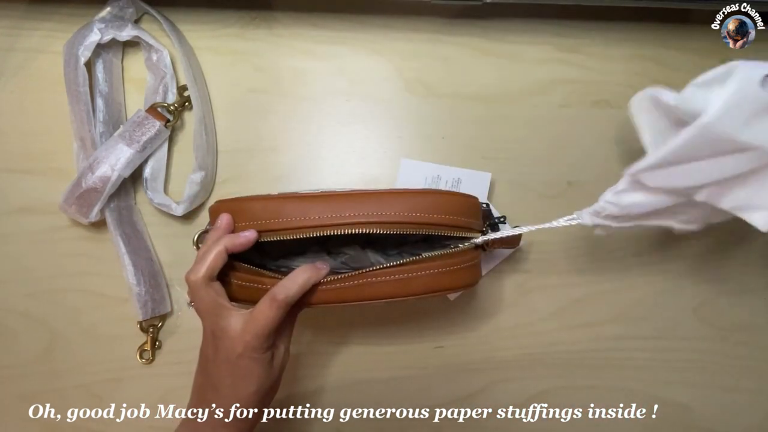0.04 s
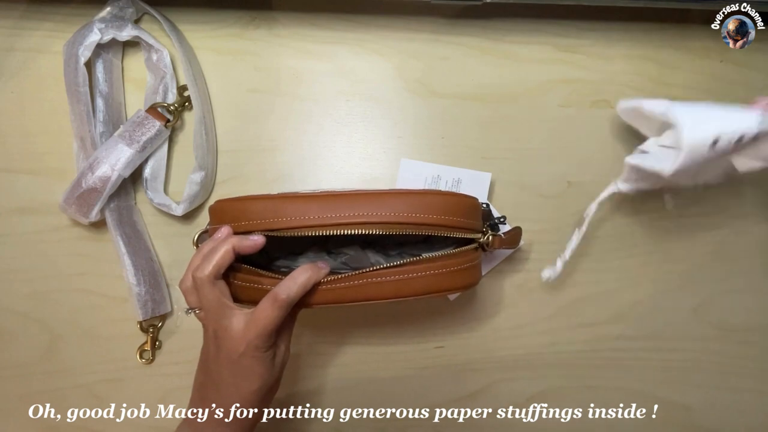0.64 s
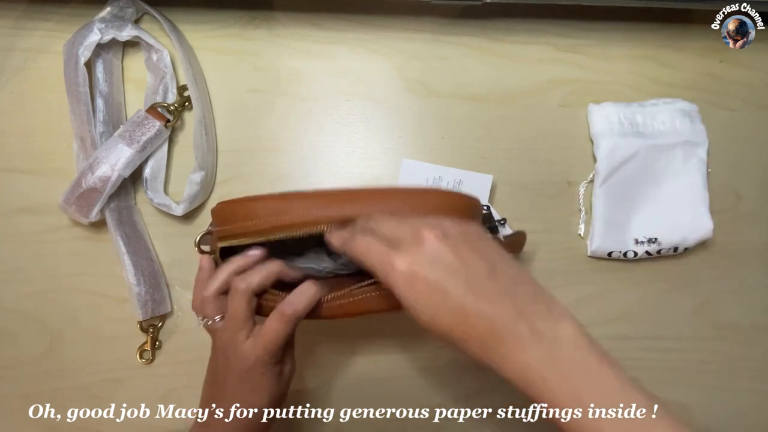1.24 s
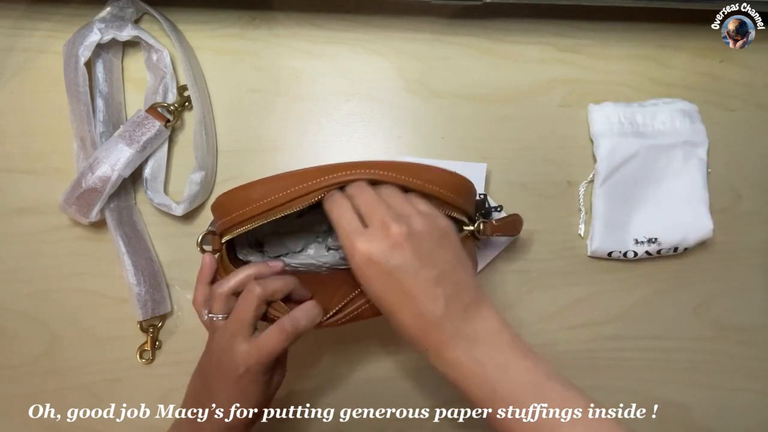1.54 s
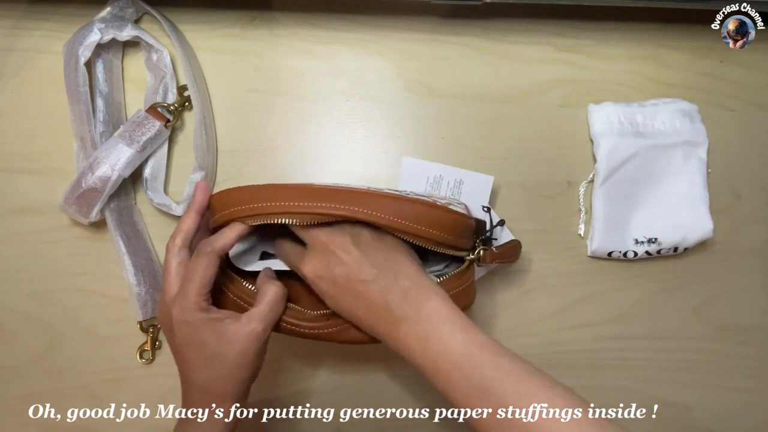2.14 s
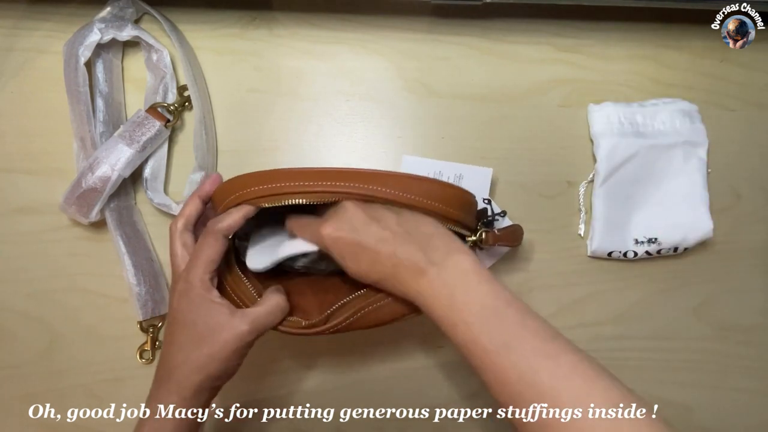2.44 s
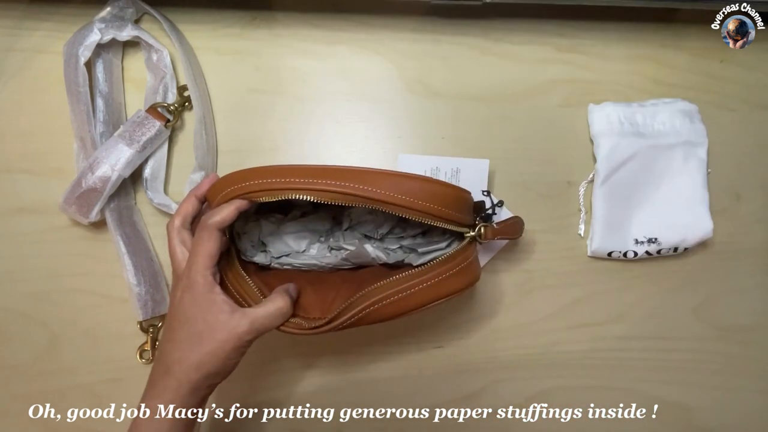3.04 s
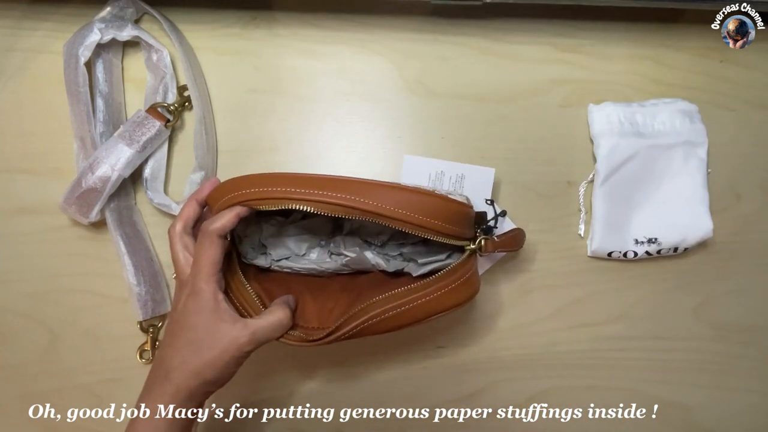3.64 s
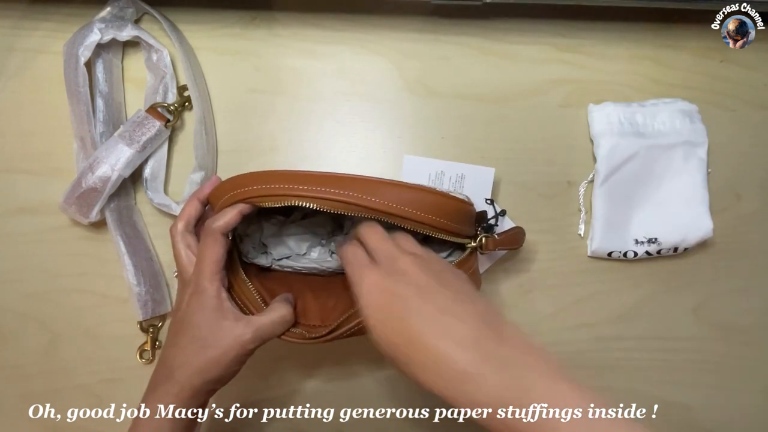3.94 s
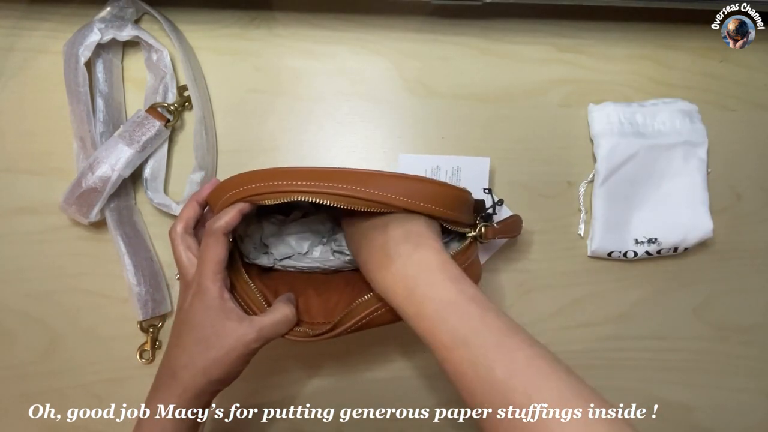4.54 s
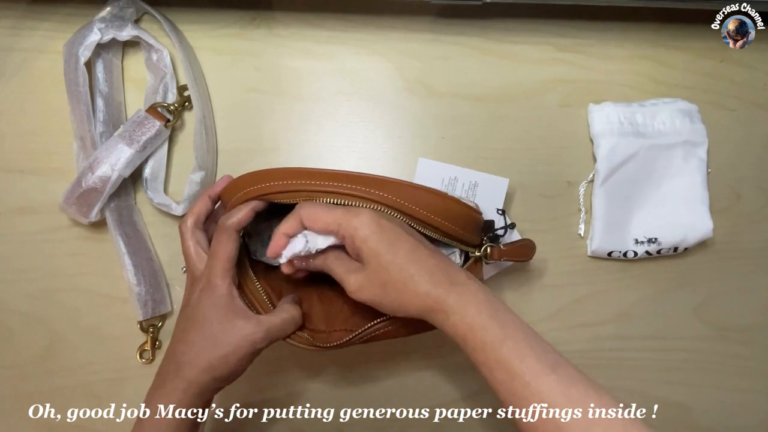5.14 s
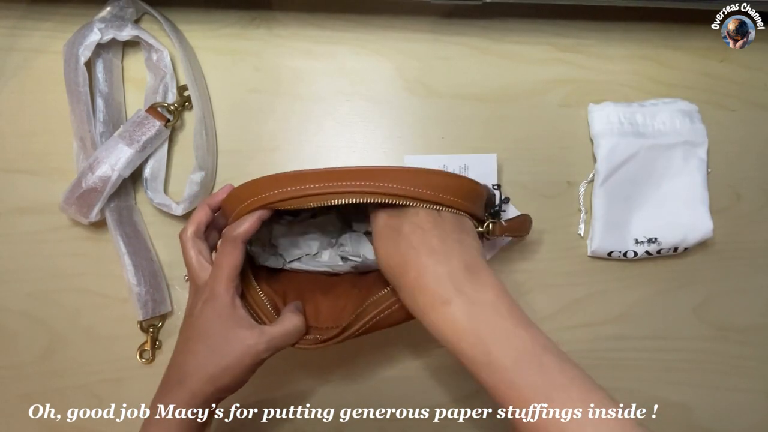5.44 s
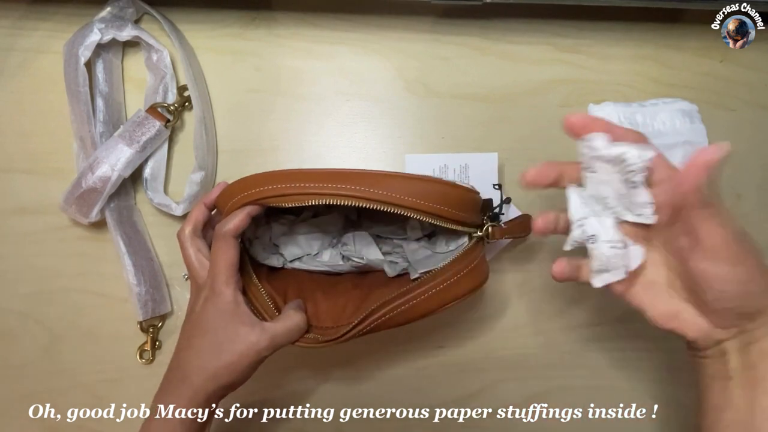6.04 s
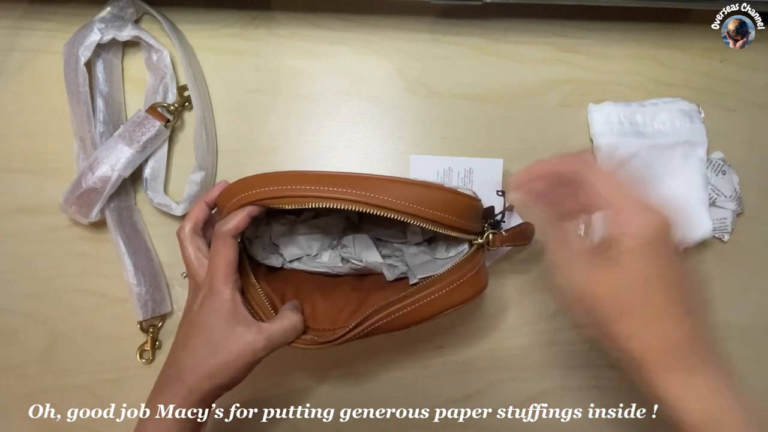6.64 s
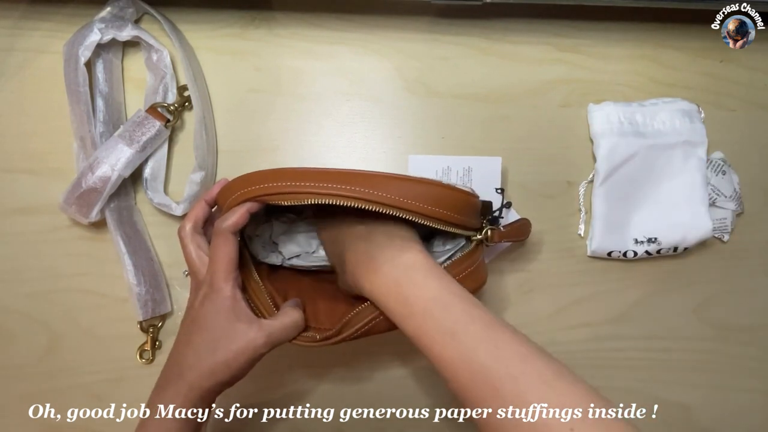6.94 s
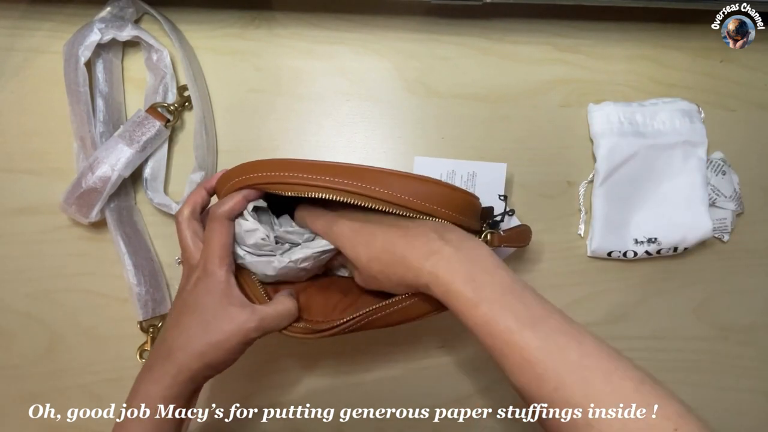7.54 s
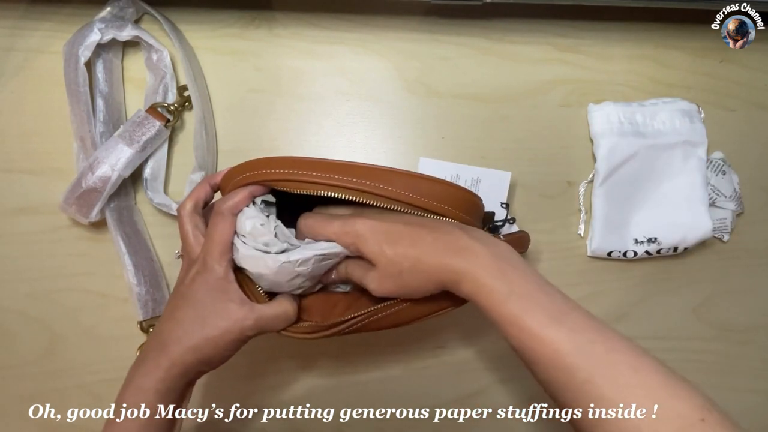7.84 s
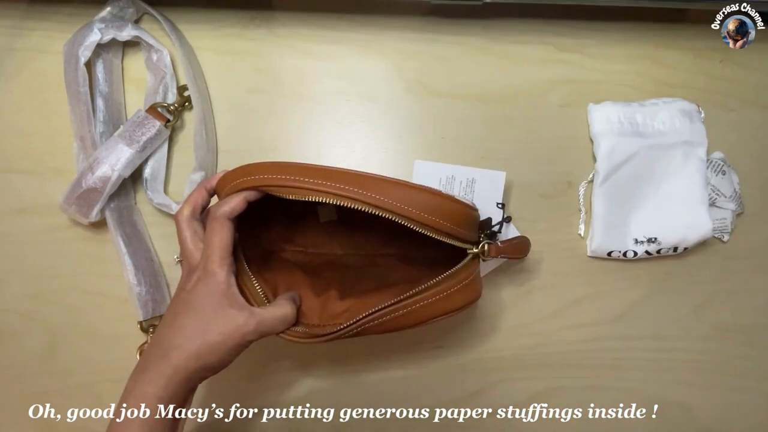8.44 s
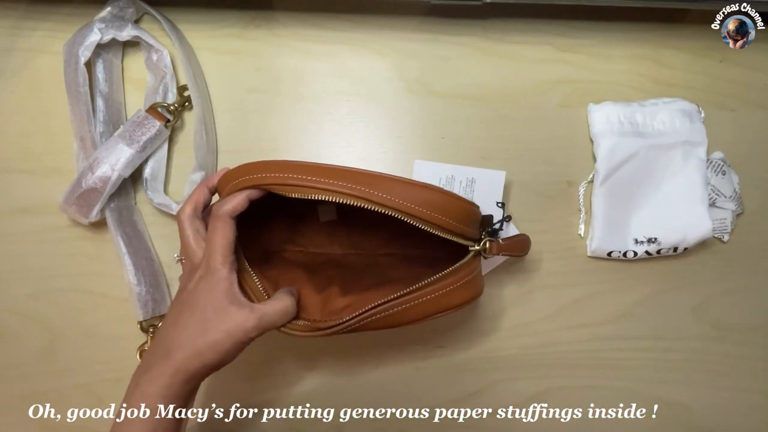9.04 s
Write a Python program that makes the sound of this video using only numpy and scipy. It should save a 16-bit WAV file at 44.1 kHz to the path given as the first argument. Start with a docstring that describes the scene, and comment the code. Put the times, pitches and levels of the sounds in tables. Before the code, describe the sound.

Crumpled paper stuffing rustles, crinkles and snaps in irregular spells as hands pull it out of a small leather bag.

```python
"""Unpacking a small leather bag

Hands dig paper stuffing out of a leather bag on a wooden desk and lay it down to the right.
Sliding paper hisses by stick-slip friction, its creases buckle in tiny snaps, and wads tear free in
short crunches. Bumps excite the modes of bag and desk, and near the end the zip pull clinks.
The small room is quiet but for a low ventilation noise."""
import sys
import numpy as np
from scipy import signal
from scipy.fft import rfft, irfft, next_fast_len
from scipy.io import wavfile

SR = 44100
rng = np.random.default_rng(int(sys.argv[2]) if len(sys.argv) > 2 else 0)


def file_out(sig):
    """Save sig as 16-bit WAV at sys.argv[1]."""
    # one column per channel
    cols = np.atleast_2d(sig).T
    # limit, then scale
    lim = np.clip(cols, -1, 1)
    pcm = np.round(lim * 32767).astype(np.int16)
    wavfile.write(sys.argv[1], SR, pcm)


N = 409248
TIME = np.arange(N) / SR
USUAL_EFFORT_DB = -47.5

# Spectra of the ventilation, of paper in the open and of paper in the bag.
# Each row: frequency in Hz, relative spectral density in dB.
VENT_SPECTRUM = [(15, -33), (25, -11.5), (146, 3.5), (271, -8.5), (383, -5), (604, -15), (769, -8),
                 (903, -13.5), (1540, -10.5), (2370, -31), (7280, -33), (9520, -30), (11200, -32),
                 (13100, -50), (15000, -55)]
OPEN_SPECTRUM = [(35, -24.5), (90, -3), (250, -15), (600, -6.5), (1200, -1.5), (2300, -2.5), (3000, -1.5),
                 (3900, -0.5), (5500, 0.5), (7000, -3), (9500, 4), (11200, 4), (12000, -8), (13200, -30),
                 (16000, -37)]
BAG_SPECTRUM = [(35, -7), (90, -3.5), (200, 2.5), (370, 5), (560, -3.5), (700, -8), (1080, -7), (2100, 0.5),
                (2700, -4), (4000, 0), (5500, 0), (7200, -2), (9000, 4.5), (9900, 9.5), (11300, 5.5),
                (12000, -1.5), (13600, -21.5), (16000, -22)]
# Likeness of left and right for each source. Each row: frequency in Hz, coherence from 0 to 1.
VENT_COHERENCE = [(100, 0.86), (400, 0.1), (1000, 0.077), (6000, 0.24), (9000, 0.79)]
OPEN_COHERENCE = [(150, 0.76), (600, 0.31), (2000, 0.55), (4000, 0.18), (6600, 0.86), (7600, 0.97),
                  (12000, 0.87)]
BAG_COHERENCE = [(150, .97), (400, .92), (700, .75), (2000, .78), (3500, .62), (6500, .4), (8500, .9),
                 (12000, .88)]
CRUNCH_COHERENCE = [(300, .9), (700, .7), (2000, .7), (3500, .6), (6500, .35), (8500, .7), (12000, .7)]
# Level difference between the ears. Each row: frequency in Hz, left minus right in dB.
OPEN_PAN = [(150, -9), (900, -3), (1900, -3), (3600, -4.5), (4600, -6), (6400, -9.5), (7800, -1), (9500, 0)]
BAG_PAN = [(150, -3.5), (400, -0.5), (900, -2.5), (2300, 0.5), (3300, -3.5), (4200, 2), (5800, -5.5),
           (9000, 0)]
# Modes of a paper facet. Each row: multiple of the lowest frequency, relative level in dB.
PAPER_MODES = [(1, 2), (1.45, -3), (2.1, -7.5)]
# Joint modes of bag and desk. Each row: frequency in Hz, relative level in dB, T60 in seconds.
DESK_MODES = [(98, -20.5, .08), (123.2, -2.5, .071), (154.6, -4, .1), (197, -0.5, 0.08), (226.6, -4.5, .12),
              (283, -5, .13), (363.7, -1, .11), (488, -4.5, 0.12), (565, -23, .02), (770, 0.5, 0.033),
              (1060, -20.5, .058)]
# Air resonances of the open bag. Each row: frequency in Hz, bandwidth in Hz, boost in dB.
CAVITY_MODES = [(1048, 113, 6.5), (2070, 160, 1), (3690, 120, 3)]
# Pouch, card and paper slide over the desk; the hand brushes the rim and lining of the bag. Each row:
# time of full speed, rise per 20 dB and hold, all in seconds, then effort in dB, weight in dB.
DESK_SLIDES = [(0.14, 0.11, 0.05, -65.5, -3), (.38, 0.3, 0.23, -83.5, 2), (0.671, 0.057, 0.032, -61, 0),
               (0.783, 0.066, 0.08, -62, -1.5), (.92, .05, 0.022, -73, -4), (2.863, 0.12, 0.027, -58.5, -8),
               (3.024, 0.018, 0.01, -59, -11), (3.185, 0.013, 0.032, -54, 3),
               (3.604, 0.048, 0.03, -44.5, 0.5), (3.674, .05, 0.07, -72, 7),
               (5.991, 0.03, 0.082, -41.5, -7.5), (6.191, 0.076, 0.044, -48, -9.5),
               (6.253, 0.039, 0.25, -52.5, -11.5), (6.486, 0.034, 0.0094, -34, -5.5),
               (8.379, 0.073, 0.16, -58.5, -0.5), (8.69, .1, 0.011, -48.5, -1),
               (8.775, 0.1, 0.057, -44.5, 2), (8.868, 0.075, 0.071, -58, 4), (9.004, 0.046, 0.21, -70.5, 1)]
RIM_BRUSHES = [(1.565, 0.11, 0.021, -59.5, -1), (4.02, 0.043, 0.13, -56.5, -26),
               (6.845, 0.041, 0.051, -45.5, 1)]
# Soft blows on bag and desk. Each row: start in seconds, relative level in dB, pitch in Hz,
# T60 in seconds.
BLOWS = [(.171, -43, 576, 0.038), (.178, -43.5, 143, 0.043), (0.397, -47.5, 307, 0.046),
         (0.687, -35, 188, 0.061), (.689, -41, 765, .03), (0.796, -41, 215, 0.14),
         (1.18, -41.5, 338, 0.073), (1.226, -39.5, 375, 0.057), (1.635, -33, 127, 0.085),
         (1.683, -36, 144, 0.089), (1.751, -34, 407, 0.054), (1.757, -41, 160, 0.054),
         (1.793, -41.5, 155, 0.099), (1.815, -42, 226, 0.12), (1.846, -41.5, 103, 0.1),
         (1.965, -41.5, 380, 0.045), (2.104, -39, 217, .06), (2.121, -37, 134, 0.078),
         (2.24, -37, 194, .06), (2.524, -29.5, 362, 0.057), (2.576, -27.5, 1244, 0.049),
         (2.583, -30, 815, 0.057), (3.195, -47.5, 168, 0.042), (3.657, -31, 625, 0.021),
         (3.66, -35.5, 1360, 0.025), (3.75, -46, 372, 0.086), (4.021, -42, 183, .06), (4.2, -38, 154, .07),
         (4.235, -32.5, 363, 0.076), (4.332, -34, 221, 0.042), (4.489, -45, 380, 0.07),
         (4.728, -42.5, 145, 0.11), (4.792, -42.5, 144, .06), (4.884, -39, 212, 0.056),
         (5.006, -34.5, 368, 0.054), (5.096, -52, 360, 0.046), (6.489, -22, 230, 0.015),
         (6.496, -23.5, 127, 0.039), (6.536, -45, 184, .07), (6.916, -29.5, 191, 0.12),
         (7.072, -38.5, 143, 0.22), (7.328, -25, 262, 0.05), (7.348, -39, 149, .06),
         (7.373, -32.5, 236, 0.052), (7.45, -29, 217, 0.045), (7.487, -32, 200, 0.057),
         (7.511, -30.5, 191, 0.072), (7.557, -22.5, 292, 0.052), (7.567, -38, 200, .06),
         (7.773, -40, 200, .05), (7.852, -35, 272, 0.095), (7.939, -17.5, 216, 0.037),
         (7.941, -17.5, 332, 0.061), (7.975, -29.5, 208.3, 0.065), (8.042, -33.5, 209, 0.13)]
# Large creases snapping. Each row: start in seconds, relative levels of tick and pop in dB,
# pitch of the pop in Hz.
CREASE_SNAPS = [(.3597, -43, -32, 940), (0.435, -61, -29, 1880), (0.788, -29.5, -30, 2450),
                (1.109, -54, -42.5, 3300), (1.181, -39, -34, 1060), (1.225, -34, -32, 1900),
                (1.36, -26, -47.5, 2000), (1.635, -40, -32.5, 3000), (1.712, -32, -24.5, 1950),
                (1.783, -42, -25, 1500), (1.913, -24.5, -27.5, 1730), (2.106, -16.5, -8, 1690),
                (2.118, -27, -7.5, 1840), (2.132, -32, -17, 990), (2.216, -29, -20, 1910),
                (2.241, -15, -14.5, 1090), (2.305, -22, -15.5, 1680), (2.3516, -18, -16, 1900),
                (2.475, -27.5, -17, 1980), (2.5256, -11, -6, 4300), (2.535, -13, -10, 1900),
                (2.551, -13, -6, 2160), (2.667, -22, -15, 5470), (2.679, -34, -17.5, 1510),
                (3.1738, -27, -26, 5560), (3.197, -24, -28, 3370), (4.097, -33, -18.5, 2090),
                (4.216, -27, -23, 770), (4.2405, -5.5, -13, 1020), (4.247, -9.5, -14, 2110),
                (4.283, -16, -13, 1730), (4.303, -24, -12, 940), (4.312, -19, -25, 1720),
                (4.384, -18, -14, 1740), (4.397, -15, -23, 820), (4.414, -22, -18, 2000),
                (4.472, -20, -19, 1900), (4.479, -13.5, -31, 3570), (4.593, -30, -16.5, 1690),
                (4.617, -16.5, -17, 1130), (4.699, -37, -15, 940), (4.733, -33, -14, 1850),
                (4.785, -40, -14, 1820), (4.821, -24, -14.5, 1730), (4.857, -14, -19, 1850),
                (4.917, -19, -37, 1770), (4.961, -30, -15.5, 1810), (5.0034, -12, -9.5, 3740),
                (5.046, -15, -24, 1460), (5.0567, -15, -14, 1240), (5.104, -18, -16, 1980),
                (5.141, -31, -18.5, 1850), (5.204, -17.5, -30, 3750), (5.242, -11.5, -19, 1950),
                (5.286, -10, -19, 5500), (5.3288, -7.5, -18, 2560), (5.336, -22, -16.5, 2020),
                (5.476, -19, -29, 2210), (5.659, -21, -32, 2040), (5.713, -20, -15, 1058),
                (5.741, -16, -25, 1850), (5.789, -26, -35, 3620), (5.801, -30, -17, 2070),
                (5.817, -10, -5.5, 2200), (5.854, -15.5, -17.5, 3750), (5.8904, -10, -10, 1040),
                (5.9859, -13, -14, 4270), (6.003, -13, -26, 5510), (6.344, -24, -22.5, 5470),
                (6.4738, -5.5, -11, 3690), (6.81, -26, -27, 1053), (6.8875, -10, -14.5, 3600),
                (7.057, -24, -18.5, 1730), (7.143, -23.5, -36, 3670), (7.2, -35, -20, 2070),
                (7.224, -26, -21, 1980), (7.3254, -3.5, -15, 1550), (7.346, -8, -8, 770),
                (7.362, -16, -9, 1750), (7.372, -5, -3, 3130), (7.406, -26, -11.5, 2070),
                (7.445, -2, -4, 1527), (7.474, -20, -11, 2770), (7.4828, -13, -4.5, 2120),
                (7.494, -8, -10, 2200), (7.5163, -10.5, -5, 2130), (7.539, -9, -9, 2070),
                (7.555, -10, -16, 2070), (7.588, -28, -19, 1770), (7.596, -14.5, -14.5, 2150),
                (7.659, -32, -18, 2180), (7.674, -21, -13, 2070), (7.693, -14.5, -14, 2130),
                (7.7507, -6, -10, 2070), (7.757, -16, -11, 2220), (7.784, -12, -10, 2200),
                (7.799, -21.5, -9, 1850), (7.821, -8, -10.5, 1700), (7.857, -22, -17, 1290),
                (7.897, -13, -9.5, 1180), (7.942, 1, -5, 2340), (8.012, -12.5, -30, 1300),
                (8.075, -12.5, -23, 1980), (8.088, -20, -24, 1890), (8.126, -13, -25, 775),
                (8.1712, -11, -21, 2340), (8.197, -28, -22, 1490), (8.335, -31, -28, 4600),
                (8.3731, -18.5, -20.5, 3780), (8.436, -44, -26, 5350), (8.445, -48, -29, 5600),
                (8.5115, -23.5, -20, 2540), (8.595, -38, -34, 5200), (8.651, -43, -27, 3000),
                (8.797, -13.5, -31, 860), (8.904, -35, -26, 2980), (8.953, -37, -27, 5440),
                (8.983, -30, -26.5, 5730), (9.163, -48, -37.5, 4940)]
# Effort of the hand in the bag, one curve per gesture. Each point: time in seconds, effort in dB.
GESTURE_EFFORT = [
    [(1.168, -94), (1.19, -59), (1.222, -73), (1.245, -63), (1.29, -58), (1.37, -64.5), (1.41, -83),
     (1.47, -97)],
    [(1.47, -95), (1.6, -60.5), (1.72, -67), (1.83, -65.5), (1.87, -62.5), (1.99, -57), (2.04, -57),
     (2.075, -70), (2.15, -56.5)],
    [(2.15, -66), (2.18, -62), (2.27, -54.5), (2.456, -47), (2.526, -46.5), (2.644, -49), (2.675, -51.5),
     (2.70, -64.5), (2.82, -101)],
    [(3.97, -84.5), (4.095, -51.5), (4.14, -59), (4.21, -46.5), (4.32, -47.5), (4.36, -51), (4.56, -55.5),
     (4.71, -55.5), (4.87, -42.5), (4.93, -51.5), (4.98, -43), (5.11, -46), (5.16, -53.5)],
    [(5.16, -53), (5.25, -44), (5.34, -44.5), (5.42, -51.5), (5.49, -44), (5.56, -51.5), (5.7, -48),
     (5.78, -51), (5.86, -44), (5.92, -56.5), (5.96, -57)],
    [(6.88, -58), (6.97, -54.5), (7.05, -61), (7.13, -63.5), (7.23, -49), (7.29, -39.5), (7.42, -46),
     (7.46, -45.5), (7.57, -42), (7.63, -55.5)],
    [(7.63, -48), (7.68, -46), (7.725, -49.5), (7.77, -46), (7.91, -42.5), (7.975, -44), (8.01, -42.5),
     (8.06, -43.5), (8.115, -53.5), (8.2, -62.5), (8.225, -77), (8.28, -71)],
]
# Pressure of paper on leather while opening the bag, feeling for the card, drawing it out, digging
# for the first wad, balling it up, tugging at the second and pulling it free.
# Each row: rub offset in dB, jostle offset in dB.
GESTURE_PRESSURE = [(-0.5, 2.5), (-2, 4.5), (-1, 0.5), (1.5, -2.5), (1, -1.5), (1.5, -0.5), (0.5, 0)]
# The wad is held clear of the leather. Each row: start in seconds, length in seconds.
WAD_LIFTS = [(5.158, 0.17), (5.796, 0.15)]
# An arm leans on the desk. Each row: time of full weight, rise per 20 dB and hold, all in seconds,
# then level in dB.
ARM_LEANS = [(1.668, 0.06, 0.039, -54.5), (2.1, 0.13, 0.5, -66.5), (3.676, 0.43, 0.22, -63),
             (5.413, 0.29, 0.073, -61.5), (6.935, 0.12, 0.048, -60)]
# A nail or paper edge drags over leather, card or desk. Each row: start in seconds, length in seconds,
# level in dB, centre frequency in Hz, approximate bandwidth as a share of the centre.
EDGE_SCRAPES = [(1.812, 0.021, -55, 5660, 0.37), (2.106, 0.021, -43, 1300, 1.0),
                (2.6, 0.042, -43, 9050, 0.2), (2.642, 0.011, -51, 920, 0.54), (2.86, .04, -67, 2950, .25),
                (3.748, 0.019, -58.5, 850, 0.85), (6.218, 0.049, -58, 2840, 0.32),
                (6.297, 0.073, -59.5, 3400, 0.36), (6.81, 0.063, -51, 1040, 0.29),
                (8.071, 0.015, -41.5, 1300, 1)]
# Wads tear free or land. Each row: start in seconds, length in seconds, level in dB,
# tug on the bag in dB relative to that level.
WAD_CRUNCHES = [(2.002, 0.013, -49, 1.5), (2.095, 0.032, -43.5, -1), (2.204, 0.013, -48.5, -16),
                (2.525, 0.038, -34.5, -27), (2.567, 0.02, -27.5, -31), (4.239, 0.024, -41, -11),
                (4.382, 0.029, -43.5, -10), (4.471, 0.026, -46, -2), (4.598, 0.031, -46, -4),
                (5.092, 0.023, -36, -2), (5.325, .0064, -40.5, -25), (6.474, 0.023, -25.5, -16),
                (7.318, 0.022, -39.5, -18), (7.443, 0.03, -35, -5.5), (7.494, 0.027, -37, -4),
                (7.55, 0.012, -31.5, -8), (7.74, 0.032, -35, -21), (7.914, 0.025, -30.5, -8),
                (7.934, 0.046, -26.5, -21), (8.065, 0.015, -40, -2.5), (8.144, 0.0071, -40, -13),
                (8.181, 0.016, -40, -5.5)]
# The zip pull clinks as the bag springs back. Each row: start in seconds, level in dB, pitch in Hz,
# T60 in seconds.
ZIP_CLINKS = [(8.359, -44.5, 2240, .018), (8.374, -40.5, 3700, 0.03)]


def from_db(db):
    """Decibels express an amplitude ratio on a logarithmic scale."""
    return 10 ** (np.asarray(db) / 20)


def unit_rms(x):
    """Division by the RMS value gives unit power."""
    return x / np.sqrt(np.mean(x ** 2) + 1e-20)


def at_hz(points, hz):
    """Interpolation reads a table along a log-frequency axis."""
    frequencies, values = np.transpose(points)
    return np.interp(np.log(hz + 1), np.log(frequencies), values)


def band(x, hz, kind, order=2):
    """A Butterworth filter passes its band with maximal flatness."""
    return signal.sosfilt(signal.butter(order, hz, kind, fs=SR, output="sos"), x + 1e-18)


def ring(x, hz, t60):
    """A damped resonator answers a unit impulse with a decaying sine of height 1."""
    radius, angle = from_db(-60 / (t60 * SR)), 2 * np.pi * hz / SR
    return signal.lfilter([0, np.sin(angle)], [1, -2 * radius * np.cos(angle), radius ** 2], x + 1e-18)


def drift(hz):
    """Low-passed noise fluctuates at random with unit spread."""
    return unit_rms(band(rng.standard_normal(N + SR), hz, "low")[SR:])


def add(track, start, sound):
    """Superposition adds a short sound to a track at a time in seconds."""
    i = int(start * SR)
    track[..., i:i + sound.shape[-1]] += sound[..., :N - i]


def swell(full_at, rise_s, hold_s, release_s):
    """An exponential envelope rises, holds and falls; each slope covers 20 dB in its time."""
    before, after = np.maximum(full_at - TIME, 0), np.maximum(TIME - full_at - hold_s, 0)
    return .1 ** (before / rise_s + after / release_s)


def colour(x, spectrum, size=8192):
    """A minimum-phase filter of unit power imposes a spectrum causally."""
    gain = unit_rms(from_db(at_hz(spectrum, np.arange(size // 2 + 1) * SR / size)))
    cepstrum = irfft(np.log(gain))
    causal = np.r_[cepstrum[0], 2 * cepstrum[1:size // 2]]
    response = irfft(np.exp(rfft(causal, size)))
    return signal.fftconvolve(x, response[None], axes=1)[:, :N]


def ventilation():
    """Ventilation is stationary noise with most of its power at low frequencies."""
    return from_db(-66) * unit_rms(colour(rng.standard_normal((2, N)), VENT_SPECTRUM))


def friction(effort, rub_db, jostle_db):
    """Crackle gain is proportional to effort; rub and jostle gains follow slower power laws."""
    push = effort / from_db(USUAL_EFFORT_DB)
    rub = from_db(rub_db - 46.5) * push ** 0.74
    jostle = from_db(jostle_db - 48.5) * push ** 0.69
    return np.array([effort, rub, jostle])


def slides(rows, release_s, rub_db, jostle_db):
    """The friction gains of slides add in power; weight raises the rub, and the jostle still more."""
    power = 0
    for full_at, rise, hold, db, weight_db in rows:
        effort = from_db(db) * swell(full_at, rise, hold, release_s)
        power += friction(effort, rub_db + weight_db, jostle_db + 2 * weight_db) ** 2
    return np.sqrt(power)


def facet(hz, cycles, ring_db, t60, tail_db, tail_t60):
    """A paper facet buckles with unit energy: it cracks, its modes ring and the wad shivers after."""
    t = TIME[:SR // 25]
    noise = rng.standard_normal((2, len(t)))
    crack = noise * (from_db(-60 * t / t60) + from_db(tail_db - 60 * t / tail_t60))
    kick = noise * np.exp(-t / 0.00038)
    tone = sum(from_db(db) * ring(kick, min(hz * ratio * rng.uniform(0.933, 1.078), SR / 3), cycles / hz)
               for ratio, db in PAPER_MODES)
    return unit_rms(unit_rms(crack) + from_db(ring_db) * unit_rms(tone)) / np.sqrt(len(t))


def grip(effort, firm_db):
    """Squeeze grows as the square root of effort, from a brush at 0.3 to a firm hold at 1."""
    return np.clip(np.sqrt(effort / from_db(firm_db)), .3, 1)


def crinkle(per_s, spread_db, slide_db, clump_db, squeeze=1, count=240):
    """Facets buckle in clumps over the stick-slip hiss of sheets; a light squeeze favours the hiss."""
    clumps = from_db(clump_db * drift(55))
    onsets = np.flatnonzero(rng.random(N) < per_s * clumps / SR)
    force = from_db(spread_db * np.minimum(rng.exponential(1, N), 3.2))
    shape_at = rng.integers(0, count, N)
    # Large facets ring lower and more weakly.
    shapes = [facet(hz, cycles=18, ring_db=1.5 + 5.5 * np.log2(hz / 5000),
                    t60=0.023, tail_db=-7.5, tail_t60=0.036) for hz in np.geomspace(700, 9000, count)]
    buckles = np.zeros((2, N))
    for i in onsets:
        add(buckles, i / SR, force[i] * shapes[shape_at[i]])
    hiss = unit_rms(rng.standard_normal((2, N)) * clumps)
    slide = from_db(slide_db)
    return (squeeze * unit_rms(buckles) + slide * hiss) / np.hypot(squeeze, slide)


def folds(per_s=340, spread_db=3.0, clump_db=2.5, count=60):
    """Broad folds buckle in clusters, each with a short, hollow pop at its own pitch."""
    onsets = np.flatnonzero(rng.random(N) < per_s * from_db(clump_db * drift(30)) / SR)
    forces = from_db(spread_db * np.minimum(rng.exponential(1, len(onsets)), 3))
    shapes = [facet(hz, cycles=24, ring_db=8, t60=.008, tail_db=-16, tail_t60=.03)
              for hz in np.geomspace(640, 2600, count)]
    pops = np.zeros((2, N))
    for i, force, k in zip(onsets, forces, rng.integers(0, count, len(onsets))):
        add(pops, i / SR, force * shapes[k])
    return unit_rms(pops)


def desk(force):
    """The forced response of bag and desk is the sum of their modes."""
    return sum((-1) ** k * from_db(db) * ring(force, hz, t60)
               for k, (hz, db, t60) in enumerate(DESK_MODES))


def leather_flex(per_s=130, cycles=10, count=24):
    """Leather walls give in random impulses, each exciting a heavily damped low resonance."""
    clicks = (rng.random(N) < per_s / SR) * rng.standard_normal(N)
    mode_at = rng.integers(0, count, N)
    return unit_rms(sum(ring(clicks * (mode_at == k), hz, cycles / hz) * np.sqrt(hz)
                        for k, hz in enumerate(np.geomspace(165, 520, count))))


def rustle(grains, pops, drive, spectrum, crackle_db, rub_db, jostle_db, desk_db):
    """Friction radiates in three bands: bright crackle, hollow rub and the low jostle of the body."""
    crackle_gain, rub_gain, jostle_gain = drive
    paper = colour(grains, spectrum)
    crackle = band(paper, 1780, "high", order=4)
    popping = band(colour(pops, spectrum), [550, 2500], "band")
    rub = unit_rms(band(paper, [550, 2500], "band", order=3)) + from_db(1) * unit_rms(popping)
    body = unit_rms(band(paper, 770, "low")) + from_db(desk_db) * unit_rms(desk(grains))
    jostle = band(body + from_db(-1) * leather_flex(), [140, 520], "band", order=3)
    return (crackle_gain * from_db(crackle_db) * unit_rms(crackle)
            + rub_gain * from_db(rub_db) * unit_rms(rub)
            + jostle_gain * from_db(jostle_db) * unit_rms(jostle))


def bumps(level_db, thud_db, desk_db):
    """A padded impact rings at the pitch of the contact, thuds in the leather and excites the desk."""
    knocks, t = np.zeros((2, N)), TIME[:SR // 3]
    click = 1.0 * (t == 0)
    for start, db, hz, t60 in BLOWS:
        scuff = rng.standard_normal(len(t)) + 0.28 * rng.standard_normal((2, len(t)))
        around_hz = [hz / 1.9, hz * 1.514]
        knock = unit_rms(ring(click, hz, t60) * (1 - np.exp(-t * hz * 2)))
        thud = unit_rms(band(scuff * from_db(-60 * t / t60), around_hz, "band"))
        wood = unit_rms(band(desk(click), around_hz, "band"))
        blow = knock + from_db(thud_db) * thud + from_db(desk_db) * wood
        add(knocks, start, from_db(db + level_db) * blow / np.abs(blow).max())
    return band(knocks, 90, "high", order=4)


def snaps(rows, tick_gain_db, pop_gain_db):
    """Snap-through of a single crease radiates a bright tick and a lower pop."""
    ticks, pops = np.zeros((2, 2, N))
    for start, tick_db, pop_db, hz in rows:
        tick_hz = rng.uniform(7500, 10500)
        tick = facet(tick_hz, cycles=45, ring_db=-10, t60=.011, tail_db=-22, tail_t60=.05)
        pop = facet(hz, cycles=14, ring_db=-1.5, t60=.012, tail_db=-22, tail_t60=.04)
        add(ticks, start + .00073, tick * from_db(tick_db + tick_gain_db))
        add(pops, start + .0006, pop * from_db(pop_db + pop_gain_db))
    return band(ticks, 6700, "high") + band(pops, [550, 6500], "band")


def hand_in_bag(lift_ramp_s=0.033, lift_loss_db=13.5):
    """Friction needs contact: a lifted wad still crackles but hardly rubs or shakes the bag."""
    drive = lifted = 0
    for curve, pressure in zip(GESTURE_EFFORT, GESTURE_PRESSURE):
        effort_db = np.interp(TIME, *np.transpose(curve), left=-300, right=-300)
        drive += friction(from_db(effort_db), *pressure)
    for start, length in WAD_LIFTS:
        end = start + length
        lifted += np.interp(TIME, [start - lift_ramp_s, start, end, end + lift_ramp_s], [0, 1, 1, 0])
    return drive * from_db(-lift_loss_db * np.outer([0, 1, 1], lifted))


def bag_cavity(x):
    """Cavity resonance in the open bag boosts a few narrow bands."""
    return x + sum((from_db(db) - 1) * signal.lfilter(*signal.iirpeak(hz, hz / width, fs=SR), x)
                   for hz, width, db in CAVITY_MODES)


def lesser_creases(effort, per_s, tick_db, pop_db, spread_db):
    """A Poisson process yields rows for snaps() while paper moves, louder with greater effort."""
    onsets = np.flatnonzero((rng.random(N) < per_s / SR) & (effort > from_db(-70)))
    db = 0.9 * (20 * np.log10(effort[onsets]) - USUAL_EFFORT_DB)
    tick, pop, octaves = rng.uniform(-1.2, 1, (len(onsets), 3)).T
    return list(zip(onsets / SR, db + tick_db + spread_db * tick, db + pop_db + spread_db * pop,
                    1900 * 2 ** octaves))


def desk_shudder(release_s=0.48):
    """Loaded by an arm, the desk top sways in a narrow band at its lowest resonance."""
    weight = sum(from_db(db) * swell(at, rise, hold, release_s) for at, rise, hold, db in ARM_LEANS)
    return weight * unit_rms(band(rng.standard_normal((2, N)), [46, 63], "band"))


def scrapes(rise_s, release_s):
    """Stick-slip motion of a dragged edge excites one broad resonance."""
    slips = rng.standard_normal((2, N)) * from_db(4.2 * drift(150))
    drags = np.zeros((2, N))
    for start, length, db, hz, width in EDGE_SCRAPES:
        resonance = unit_rms(band(slips, [hz / (1 + width / 2), hz * (1 + width / 2)], "band"))
        drags += from_db(db) * swell(start, rise_s, length, release_s) * resonance
    return drags


def crunches(attack_s, release_s, tug_release_s):
    """An avalanche of buckling builds and dies quickly, giving a crunch and a tug on the bag."""
    force, tug = np.zeros((2, N))
    t = TIME[:SR // 5]
    for start, length, db, tug_db in WAD_CRUNCHES:
        rise = from_db(db) * (1 - np.exp(-t / attack_s))
        after = np.maximum(t - length, 0)
        add(force, start, rise * np.exp(-after / release_s))
        add(tug, start, rise * from_db(tug_db) * np.exp(-after / tug_release_s))
    return force * crinkle(per_s=1400, spread_db=1.5, slide_db=2.5, clump_db=0.5), tug


def zip_pull():
    """The struck metal pull vibrates freely in one quickly damped mode."""
    clinks, t = np.zeros(N), TIME[:SR // 8]
    for start, db, hz, t60 in ZIP_CLINKS:
        add(clinks, start, from_db(db) * ring(1.0 * (t == 0), hz, t60))
    return clinks


def place(pair, coherence, pan, lag_ms):
    """Interaural coherence, level and delay turn two unrelated signals into left and right."""
    size = next_fast_len(N + SR // 10)
    mid, side = rfft(pair, size)
    hz = np.arange(len(mid)) * SR / size
    alike = np.clip(at_hz(coherence, hz), 0, .995)
    lean = from_db(at_hz(pan, hz) / 2)
    mid, side = mid * np.sqrt((1 + alike) / 2), side * np.sqrt((1 - alike) / 2)
    lag_s = lag_ms / 1000 * np.interp(hz, [6500, 7500], [1, 0])  # no delay in the high treble
    left = (mid + side) * lean * np.exp(-2j * np.pi * hz * lag_s)
    right = (mid - side) / lean
    return irfft(np.array([left, right]), size)[:, :N]


def near_echoes(x, echo_db, count=7):
    """Early reflections return from the desk, hands and other near surfaces within milliseconds."""
    lags = (rng.uniform(0.00074, .009, count) * SR).astype(int)
    echoes = sum((-1) ** k * np.pad(x, ((0, 0), (lag, 0)))[:, :N] for k, lag in enumerate(lags))
    return x + from_db(echo_db) * echoes


def room(x, level_db=-15.5, t60=0.19, treble_t60=0.051):
    """The diffuse field of a small furnished room decays exponentially, the treble first."""
    t = TIME[:SR // 2]
    noise = rng.standard_normal((2, len(t))) * np.clip((t - .004) / 0.003, 0, 1)
    tail = band(noise, [120, 6000], "band") * from_db(-60 * t / t60)
    tail += 0.61 * band(noise, 8800, "high") * from_db(-60 * t / treble_t60)
    return from_db(level_db) * signal.fftconvolve(x, unit_rms(tail) / np.sqrt(len(t)), axes=1)[:, :N]


def scene():
    """Sounds from the bag and from the paper beside it superpose with reverberation and ventilation."""
    # A drive holds three gain curves: crackle (the effort itself), rub and jostle.
    side_drive = slides(DESK_SLIDES, release_s=0.056, rub_db=-2, jostle_db=-3.5)
    bag_drive = np.hypot(hand_in_bag(), slides(RIM_BRUSHES, release_s=0.026, rub_db=-4, jostle_db=-1))
    side_effort, bag_effort = side_drive[0], bag_drive[0]
    pops = folds()
    torn, tug = crunches(attack_s=0.0034, release_s=0.0047, tug_release_s=0.005)
    digging = crinkle(per_s=620, spread_db=3.3, slide_db=-3.5, clump_db=2.0,
                      squeeze=grip(bag_effort, firm_db=-36.5))
    laying = crinkle(per_s=420, spread_db=3.0, slide_db=6.0, clump_db=2.5,
                     squeeze=grip(side_effort, firm_db=-62))
    bag = bag_cavity(rustle(digging, pops, bag_drive + np.outer([0, .8, 1], tug), BAG_SPECTRUM,
                            crackle_db=2.5, rub_db=-3, jostle_db=-5, desk_db=-5.5))
    bag += bumps(level_db=-2, thud_db=-3.5, desk_db=-5)
    bag += desk_shudder() + scrapes(rise_s=.008, release_s=.015)
    aside = rustle(laying, pops, side_drive, OPEN_SPECTRUM,
                   crackle_db=1.5, rub_db=-6.5, jostle_db=-8.5, desk_db=-22)
    vent = ventilation()
    lesser = lesser_creases(bag_effort, per_s=14, tick_db=-23, pop_db=-26, spread_db=4.5)
    cracks = snaps(CREASE_SNAPS + lesser, tick_gain_db=1.5, pop_gain_db=-0.5)
    inside = side_effort < np.maximum(bag_effort, from_db(-100))  # creases break where the hand works
    aside += colour((torn + from_db(1) * cracks) * ~inside, OPEN_SPECTRUM)
    bag_creases = bag_cavity(colour((torn + cracks) * inside, BAG_SPECTRUM))
    direct = place(aside, OPEN_COHERENCE, OPEN_PAN, lag_ms=0.3)
    direct += place(bag, BAG_COHERENCE, BAG_PAN, lag_ms=0.065)
    direct += place(bag_creases, CRUNCH_COHERENCE, BAG_PAN, lag_ms=0.034)
    near = near_echoes(direct + zip_pull(), echo_db=-21)
    return near + room(near) + place(vent, VENT_COHERENCE, [(1000, 0.021)], lag_ms=0)


def record(dry):
    """Microphone port resonance notches the treble and rings just above; a low-pass cuts the top."""
    notch_hz, notch_depth = 10330, .85
    peak_hz, peak_width_hz, peak_db = 10830, 380, 5
    stopband_hz = 16700
    notched = signal.lfilter(*signal.iirnotch(notch_hz, Q=20, fs=SR), dry)
    ported = dry + notch_depth * (notched - dry)
    ringing = signal.lfilter(*signal.iirpeak(peak_hz, peak_hz / peak_width_hz, fs=SR), ported)
    ported += (from_db(peak_db) - 1) * ringing
    return signal.sosfilt(signal.cheby2(14, 70, stopband_hz, fs=SR, output="sos"), ported)


dry = scene()
out = record(dry)
file_out(out)
```